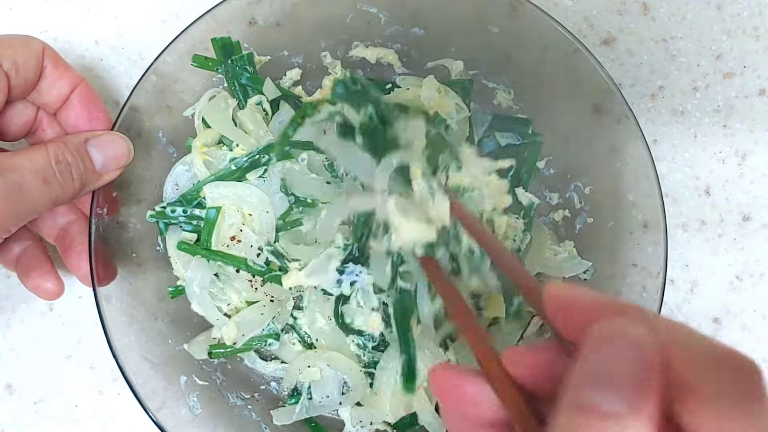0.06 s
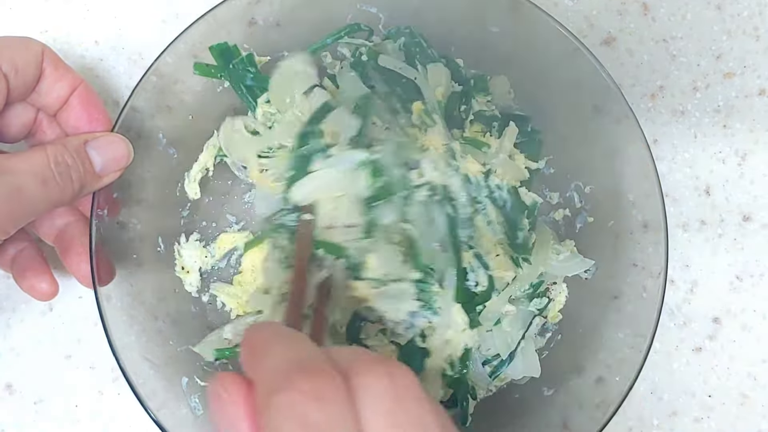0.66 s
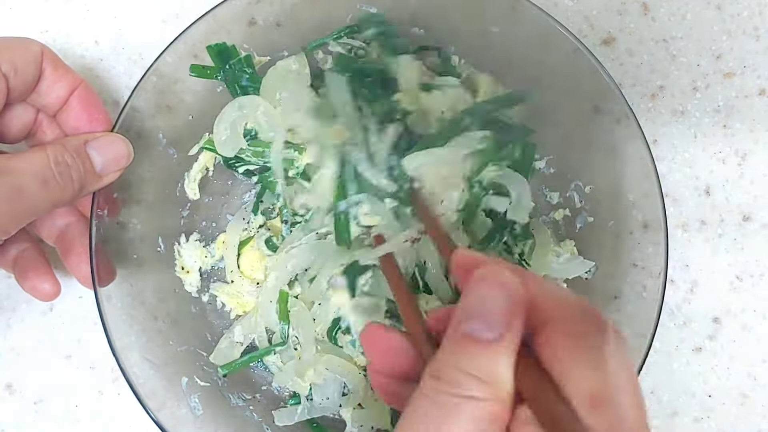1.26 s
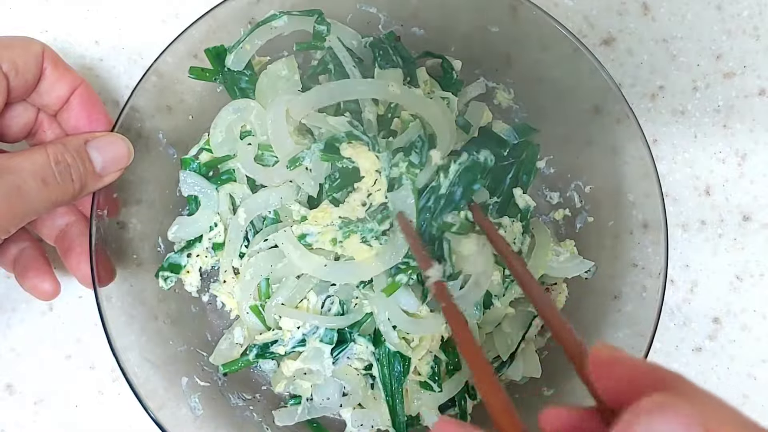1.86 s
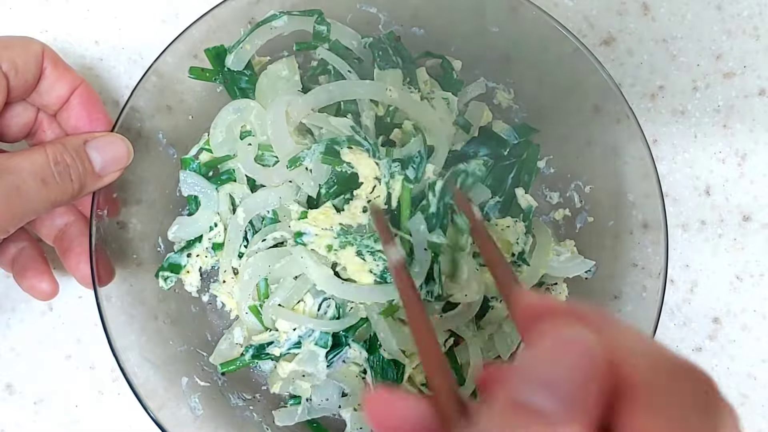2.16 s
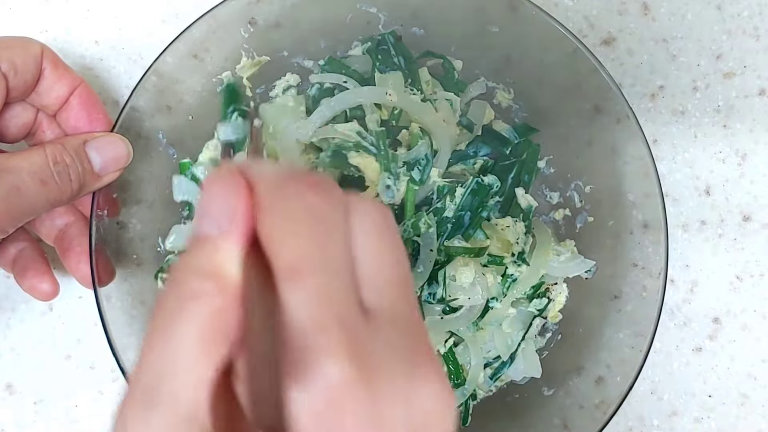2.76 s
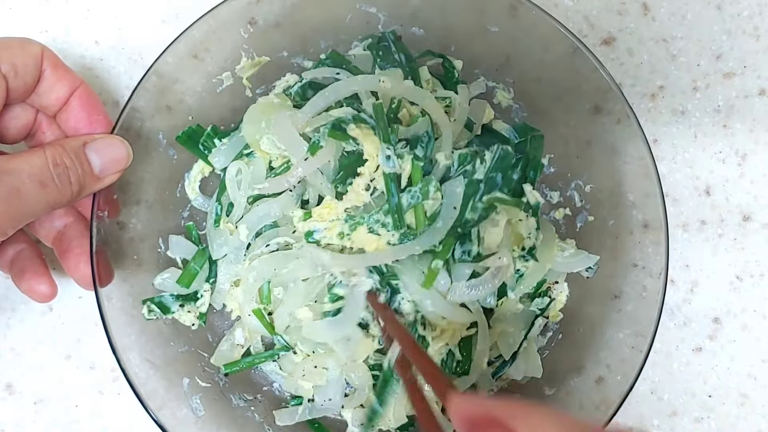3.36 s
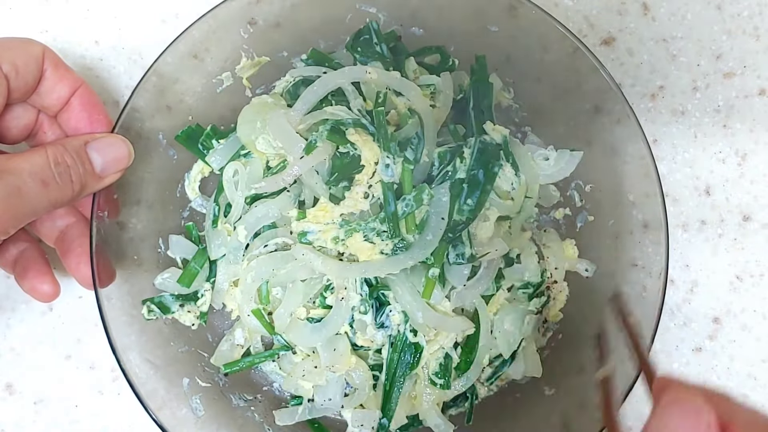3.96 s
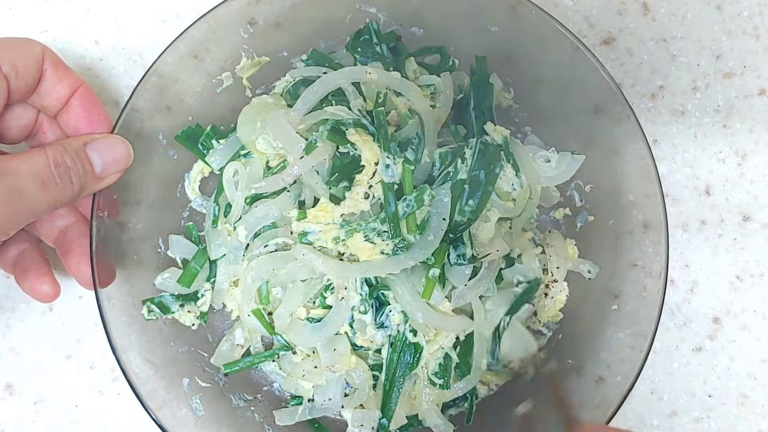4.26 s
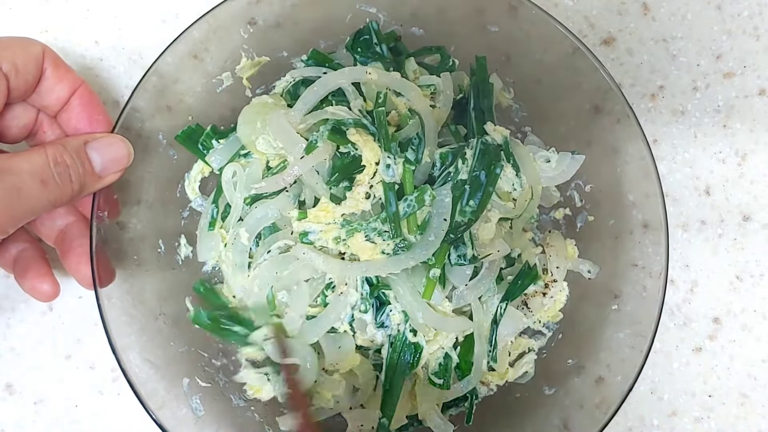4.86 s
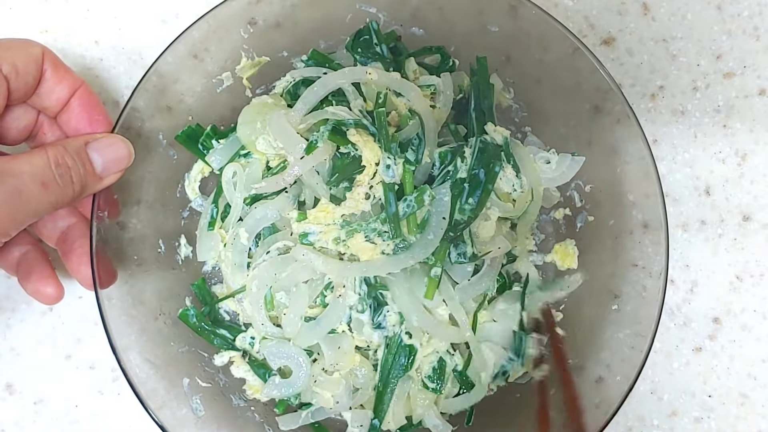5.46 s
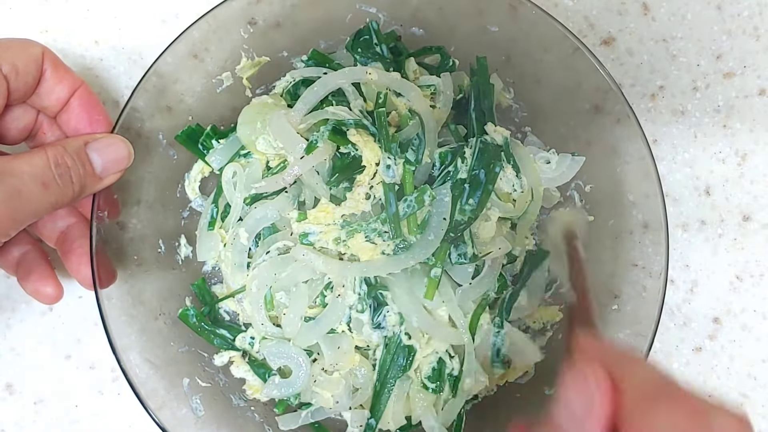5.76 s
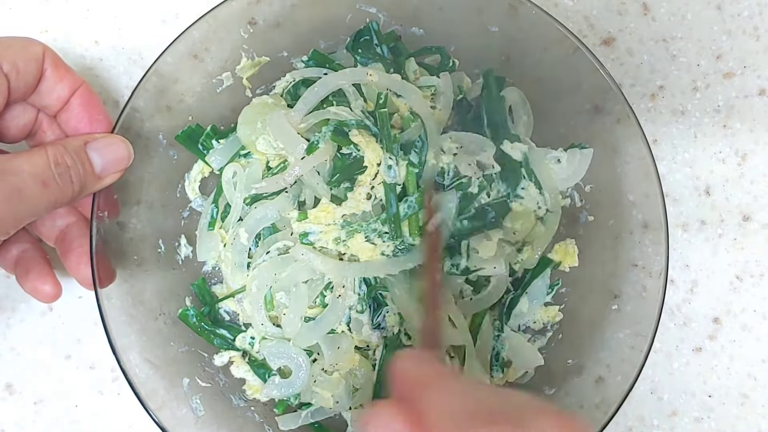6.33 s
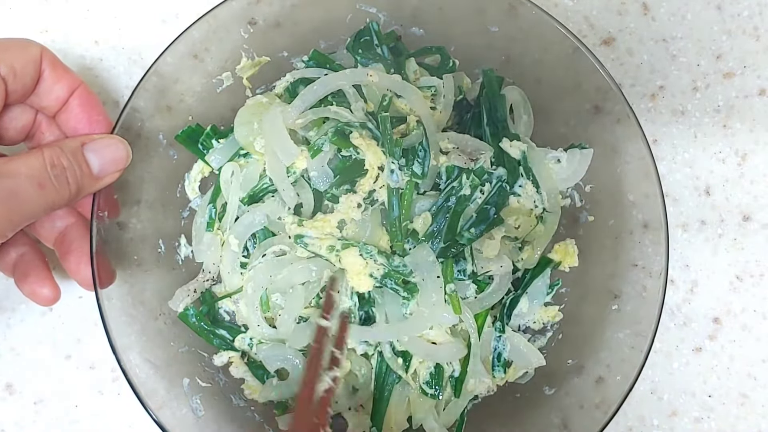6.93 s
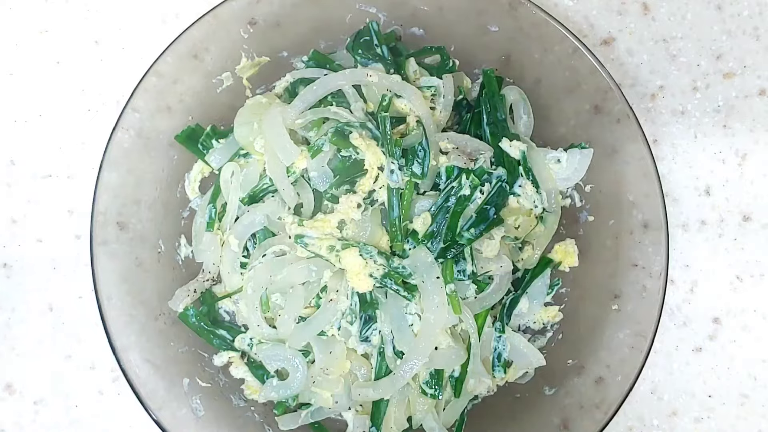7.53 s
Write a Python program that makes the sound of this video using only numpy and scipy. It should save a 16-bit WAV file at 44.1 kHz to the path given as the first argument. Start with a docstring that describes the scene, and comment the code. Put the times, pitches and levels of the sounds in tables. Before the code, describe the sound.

Wooden chopsticks toss a wet salad in a glass bowl on a counter, heard close in a small kitchen with a short echo. For the first two seconds the leaves squelch softly and the tips give light, dull, uneven knocks, with faint low thuds through the counter. Near 1.8 seconds a dragging tip makes the glass sing briefly and softly. At 2.5 seconds comes a louder double knock with a short skid and a ringing clink. A sharp, bright tick follows at about 3.1 seconds, another strong knock and skid at 4.4, and a ringing clink at 4.8. Firm knocks and small wet squelches continue, a few each second, until about 6.3 seconds. The tossing then eases, with one more clear knock near 7.3 seconds and a last faint stir. Soft air noise and a faint, low appliance hum run underneath throughout.

```python
"""Wooden chopsticks toss a wet salad in a glass bowl, held by hand on the counter of a small, hard kitchen.
First the dressed leaves squelch and the tips, mostly through leaves, knock dully while the counter thuds.
Near 1.8 s a dragging tip makes the glass sing softly. From 2.5 s the knocks grow louder, and until 5.2 s
bare wood now and then skids on the wall or clinks and rings it. After 6.3 s the tossing eases off,
ending in one faint stir. Soft air noise and the hum of an appliance lie under it all."""
import sys
import numpy as np
from scipy import signal
from scipy.fft import rfft, irfft, next_fast_len
from scipy.io import wavfile
from scipy.ndimage import uniform_filter1d, map_coordinates

SR = 44100
rng = np.random.default_rng(int(sys.argv[2]) if len(sys.argv) > 2 else 0)


def generate_wav(sig):
    """Save sig (samples, or channels by samples) to the path in sys.argv[1] as 16-bit PCM at SR."""
    pcm = np.round(np.clip(np.atleast_2d(sig).T, -1, 1) * 32767).astype(np.int16)
    wavfile.write(sys.argv[1], SR, pcm)


N = 339123
TIME = np.arange(N) / SR
AGE = np.arange(SR // 2) / SR  # seconds since a hit
TOP_HZ = 15750  # the highest pitch that is kept

# A mode is one tone that a struck thing rings with; its fade time (t60) is how long it takes to drop 60 dB.
# Modes of the chopstick and the full bowl's bottom: (pitch [Hz], relative level [dB], fade time [s])
KNOCK_MODES = [(414, -22.5, 0.03), (505, -24.5, 0.042), (734, -26, 0.3), (870, -19, .04),
               (995.6, -2, 0.045), (998.5, -13.5, 0.12), (1054.3, -8, .035), (1160.5, -14, 0.055),
               (1359, -10.5, 0.036), (1474, -13.5, 0.058), (1767, -5.5, 0.032), (1893, -2.5, 0.026),
               (1987, -6.5, .045), (2160, -17, .03), (2920, -26, 0.015), (3130, -17.5, 0.034),
               (3400, -20.5, 0.06), (3580, -13, 0.023), (3870, -27, 0.074), (5420, -21, .03),
               (6010, -12, 0.011), (6330, -26.5, 0.099), (7650, -30.5, .04), (8180, -23.5, 0.072)]
# Modes of the counter and the cabinet below: (pitch [Hz], relative level [dB], fade time [s])
COUNTER_MODES = [(89.3, -13.5, 0.52), (113.84, 1.5, 0.23), (126.3, 2, 0.23), (160.4, -1, 0.2)]
# Chopstick tips knock on the bowl, most through leaves, a few bare and bright:
# (time [s], knock level [dB], brightness [dB], relative thud level [dB])
KNOCKS = [(.0506, -63, -12, -86), (.4008, -59.5, -16.5, -79), (.6208, -37.5, -8.5, -70),
          (.6484, -48.5, -39, -66), (.7873, -54, -9, -68), (.9386, -63, -10, -83), (1.0294, -56, -24, -66),
          (1.2548, -39.5, -14, -51), (1.401, -37.5, -0.5, -62), (2.1365, -42.5, -19, -55.5),
          (2.2223, -35, -0.5, -67.5), (2.5108, -26, 10, -50.5), (2.52, -22.5, 7, -47.5),
          (2.836, -35.5, 9.5, -58), (3.0669, -27, -5.5, -41.5), (3.5461, -35, -6.5, -58),
          (3.788, -43, -5, -53), (3.9148, -33.5, -3, -60.5), (4.0951, -46, -1.5, -67.5),
          (4.1864, -44.5, -25.5, -62), (4.2731, -33, -4.5, -65), (4.407, -41, 10, -46),
          (4.4169, -22, 3.5, -43), (4.5154, -38.5, -4.5, -70.5), (4.7752, -43.5, 18, -52.5),
          (5.1817, -44.5, 10.5, -57.5), (5.2137, -39.5, -4, -55.5), (5.3856, -28, 1, -53),
          (5.5347, -54.5, 11.5, -61), (5.5921, -27, -2, -49.5), (5.6903, -25.5, 4, -52.5),
          (5.9192, -45, 8.5, -57.5), (6.01, -25.5, 2.5, -56.5), (6.2298, -33.5, -10.5, -52),
          (6.2991, -28.5, -0.5, -62), (6.8713, -48, -17, -72), (6.9644, -56, -12, -71.5),
          (7.2729, -35, -2.5, -63)]


def knocks():
    """The salad damps the bowl, so each knock is short; the counter's thud swells and dies slowly."""
    contact_colour = [(150, -25.5), (600, -13), (1500, 5.5), (3600, -3), (4600, -9.5), (8300, -13.5),
                      (11000, -43), (16000, -56)]
    shuffle_colour = [(40, -1), (150, 2), (300, -7.5), (500, 0), (900, -33)]
    out = np.zeros((2, N))
    for start, db, bright_db, thud_db in KNOCKS:
        body = ring(KNOCK_MODES, scatter_db=1.5, detune=.0097, attack_s=.0011, apart_hz=6970,
                    bright_db=bright_db)
        contact = unit(burst(contact_colour, t60=.025), .0066)
        knock = unit(body, .0092) + amp(bright_db - 10.5) * contact
        add(out, start, in_kitchen(amp(db) * knock, wet_db=-9.5))
        thud = unit(ring(COUNTER_MODES, scatter_db=-.5, detune=.035, attack_s=.2, apart_hz=1500), .09)
        # the bowl shifts on its foot: 1 dB louder for every 2 dB of thud
        shuffle = unit(all_around(burst(shuffle_colour, t60=.3)), .07)
        add(out, start, amp(thud_db - 1) * thud + amp(.5 * thud_db - 34.5) * shuffle)
    return out


# Tone colour of a tick on the rim: (pitch [Hz], relative level [dB])
TICK_COLOUR = [(600, -37), (2500, -25), (3600, -19), (4300, -18.5), (5500, -13.5), (7400, 1.5), (8200, -5),
               (9300, -14.5), (10400, -23), (12500, -36.5), (16000, -58.5)]
# High, quickly fading modes of the rim: (pitch [Hz], relative level [dB], fade time [s])
RIM_MODES = [(5750, -4.5, 0.067), (6900, -11, 0.033), (7440, 0.5, 0.049), (8230, -5.5, .1),
             (8730, -7.5, .1), (8660, -5, .1)]
# Modes of the freely ringing glass wall: (pitch [Hz], relative level [dB], fade time [s])
GLASS_MODES = [(734, 0, .23), (1007, -13, .2), (1795, -14, .17), (2430, -19, .17), (3415, -1.5, .22),
               (4560, .5, .17), (5830, -4.5, .25), (7294, -4, .22), (7811, -11, .23), (8856, -19, .22)]
# Bare wood hits the glass: (time [s], relative tick level [dB], ring level [dB], ring brightness [dB])
CLINKS = [(2.5095, -34, -38, 8.5), (2.52, -38, -50.5, 6.5), (2.836, -58, -42, -11),
          (3.0669, -13, -47.5, 4.5), (4.0951, -60.5, -56.5, -14.5), (4.408, -50, -58, -4),
          (4.7747, -20.5, -37, 1.5), (5.1817, -71, -54.5, 3.5)]


def clinks():
    """A hard hit gives a sharp tick at the rim and leaves the glass ringing."""
    out = np.zeros((2, N))
    for start, tick_db, ring_db, bright_db in CLINKS:
        shared, apart = burst(TICK_COLOUR, t60=.016)
        crack = unit(shared + np.outer([.7, -.7], apart), .013)  # partly alike on the left and right
        rim = unit(ring(RIM_MODES, scatter_db=2, detune=.001, attack_s=.0004, apart_hz=20000), .012)
        tick = amp(tick_db - 4.5) * (crack + amp(-10.5) * rim)
        wall = ring(GLASS_MODES, scatter_db=1.5, detune=.0003, attack_s=.003, apart_hz=14000,
                    bright_db=bright_db)
        glass = amp(ring_db) * unit(wall, .07)
        add(out, start, in_kitchen(tick, wet_db=-4.5) + in_kitchen(glass, wet_db=-8))
    return out


# Tone colour of wet leaves: (pitch [Hz], relative level [dB])
SQUELCH_COLOUR = [(300, -4.5), (1500, -7.5), (3000, -11), (4500, -14), (6200, -9), (7800, 3.5), (9200, -2),
                  (10500, -9), (12500, -18.5), (16000, -31)]
# Wet leaves snap apart: (time [s], relative level [dB])
SNAPS = [(0.196, -53), (0.7123, -38.5), (0.7955, -38), (1.2155, -44.5), (1.296, -58), (1.5614, -43),
         (1.75, -51), (2.1745, -40), (2.922, -35.5), (3.7897, -31), (5.385, -33.5), (5.9165, -35.5),
         (6.5789, -46.5)]


def wet_leaves(hiss_db=-8):
    """Films of dressing burst in clumps of tiny pops as the leaves slide and part."""
    clumps = amp(3 * wobble(60))
    fizz = bubble_pops() + amp(hiss_db) * rng.standard_normal((2, N))
    out = stirring() * clumps * unit(coloured(fizz, SQUELCH_COLOUR))
    for start, db in SNAPS:
        add(out, start, amp(db - 9.5) * unit(burst(SQUELCH_COLOUR, t60=.0096), .0016))
    return in_kitchen(out, wet_db=-3, build_s=.0015)


def bubble_pops(count=5500, centre_hz=7200, spread=.35, fade_cycles=3, size_db=5):
    """Tiny bubbles burst at random times and places, each a high tone that dies in a few swings."""
    starts = (rng.random(count) * N).astype(int)
    hz = np.minimum(centre_hz * np.exp(spread * rng.standard_normal((count, 1))), TOP_HZ)
    size = np.minimum(rng.exponential(size=(count, 1)), 3)
    left_share = rng.random((count, 1))
    t = AGE[:SR // 300]
    pops = amp(size_db * size) * np.sin(2 * np.pi * hz * t) * np.exp(-hz * t / fade_cycles)
    slots = (starts[:, None] + np.arange(len(t))).ravel()  # where each pop's samples land
    sides = [np.bincount(slots, (pops * share).ravel(), N)[:N] for share in (left_share, 1 - left_share)]
    return unit(np.array(sides))


# The chopsticks push through the leaves: (time [s], length [s], level [dB])
STROKES = [(0, 0.11, -79), (0.609, .11, -54.5), (1.228, 0.13, -54.5), (1.469, 0.095, -66.5),
           (2.074, 0.087, -68), (2.63, 0.025, -66), (2.883, 0.028, -60), (3.335, 0.13, -76),
           (3.756, .04, -52), (3.917, 0.04, -62.5), (4.098, 0.091, -59.5), (5.158, 0.054, -65.5),
           (5.328, 0.017, -50), (5.544, 0.023, -52.5), (5.644, 0.024, -55), (5.857, .04, -50),
           (6.188, 0.062, -59), (6.467, 0.13, -74), (7.567, 0.094, -75.5)]


def stirring(push_s=.03, settle_t60=.27, resting_db=-85):
    """How loud the leaves are: each stroke builds, holds while the tips travel, and dies as they settle."""
    effort = np.full(N, amp(resting_db))
    for start, length, db in STROKES:
        push = np.clip((TIME - start) / push_s, 0, 1)
        settle = fade(np.maximum(TIME - start - length, 0), settle_t60)
        effort += amp(db) * push * settle
    return effort


# A tip skids and chatters along the wall: (time [s], length [s], level [dB], centre pitch [Hz])
SKIDS = [(1.453, 0.0049, -61.5, 2660), (2.501, .022, -27, 1555), (4.389, 0.054, -42, 1110)]


def skids(slips_per_s=900, width=.45):
    """Quick, uneven slips swell and ease, shaking one broad mode of the chopstick."""
    out = np.zeros((2, N))
    for start, length, db, centre_hz in SKIDS:
        def wood(hz):
            """The chopstick answers most near its centre pitch."""
            damping = 1j * hz * width * centre_hz
            return (damping / (centre_hz ** 2 - hz ** 2 + damping)) ** 2

        slips = rng.random(len(AGE)) < slips_per_s / SR
        hiss = .032 * rng.standard_normal((2, len(AGE)))
        pressure = np.sin(np.pi * np.minimum(AGE / length, 1))
        chatter = unit(filtered((slips + hiss) * pressure, wood), length)
        add(out, start, in_kitchen(amp(db) * chatter, wet_db=-.5))
    return out


# A tip drags on the glass and makes it sing: (time [s], length [s], level [dB])
RUBS = [(1.759, 0.12, -55.5)]


def rubs():
    """Rubbing swells the lowest mode of the glass for a moment."""
    out = np.zeros((2, N))
    lowest_hz = GLASS_MODES[0][0]
    for start, length, db in RUBS:
        t = AGE[AGE < length]
        tone = np.sin(np.pi * t / length) * np.sin(2 * np.pi * lowest_hz * t)
        add(out, start, amp(db) * np.array([tone, tone]))
    return out


# How long the kitchen echoes: (pitch [Hz], fade time [s])
ECHO_TIMES = [(120, 0.71), (500, 0.28), (1500, 0.23), (4000, 0.3), (8000, 0.24), (14000, 0.067)]


def in_kitchen(x, wet_db, build_s=.0021):
    """A sound plus its dense echo off counter, tiles and cupboards; wet_db sets the echo's level."""
    hz, t, bands = signal.stft(rng.standard_normal((2, len(AGE))), SR, nperseg=256)
    bands = bands * fade(t, along(ECHO_TIMES, hz)[:, None])
    echo = signal.istft(bands, SR, nperseg=256)[1][:, :len(AGE)]
    echo *= 1 - np.exp(-(AGE / build_s) ** 2)
    echo = all_around(echo / np.linalg.norm(echo[0]))
    return x + amp(wet_db) * signal.fftconvolve(x, echo, axes=1)[:, :x.shape[1]]


# Tone colour of the room's air: (pitch [Hz], relative level [dB])
AIR_COLOUR = [(25, -32), (45, -18), (65, -17), (110, -16.5), (180, -24), (270, -25.5), (450, -23.5),
              (700, -26.5), (1000, -22), (1380, -17.5), (1800, -31.5), (2600, -36), (5500, -39.5),
              (6800, -39.5), (7500, -32.5), (8900, -36), (9800, -39), (16000, -45.5)]
# The tones in each hum: (multiple of the lowest pitch, level [dB])
HUM_TONES = [(1, -63), (2, -77.5), (3, -85.5)]


def air_and_hum(air_db=-69, mains_hz=60.02, motor_hz=58.88, waver_db=1.5, in_step_s=.04):
    """Soft air noise and an appliance: its motor lags the mains power, so the two hums throb slowly."""
    air = unit(coloured(all_around(rng.standard_normal((2, N))), AIR_COLOUR))
    hum = np.zeros(N)
    for hz in (mains_hz, motor_hz):
        phase = 2 * np.pi * hz * (TIME - in_step_s) + .15 * wobble(1.5)
        for multiple, db in HUM_TONES:
            hum += amp(db + waver_db * wobble(1.3)) * unit(np.sin(multiple * phase))
    return amp(air_db) * air + hum


# How alike the room sounds on the left and right: (pitch [Hz], likeness [0 to 1])
LIKENESS = [(60, 1), (300, 0.26), (1200, 0.19), (4000, 0.059), (10000, 0.12)]


def all_around(noises):
    """Blend two noises so they seem to come from all around: alike in the bass, unrelated up high."""
    def blend(hz):
        """How much is shared by both sides, and how much is opposite."""
        angle = np.arccos(np.clip(along(LIKENESS, hz), -1, 1)) / 2
        return np.array([np.cos(angle), np.sin(angle)])

    shared, apart = filtered(noises, blend)
    return np.array([shared + apart, shared - apart])


def ring(modes, scatter_db, detune, attack_s, apart_hz, bright_db=0):
    """Struck modes vary with the spot that is hit; high ones reach left and right out of step."""
    hz, db, t60 = np.transpose(modes)[..., None]
    strength, tuning, flip, lag = rng.standard_normal((4, len(modes), 1))
    treble = np.clip(np.log2(hz / 1500), 0, 1)
    level = amp(db + scatter_db * strength + bright_db * treble)
    phase = 2 * np.pi * hz * (1 + detune * tuning) * AGE + np.pi * (flip > 0)
    offset = lag * np.minimum(hz / apart_hz, 1)
    loudness = level * fade(AGE, t60) * (1 - np.exp(-AGE / attack_s))
    return np.array([(loudness * np.sin(phase + side * offset)).sum(0) for side in (-1, 1)])


def burst(colour, t60):
    """A fading puff of noise with the given tone colour."""
    return coloured(rng.standard_normal((2, len(AGE))) * fade(AGE, t60), colour)


def coloured(x, colour):
    """Shape x with (pitch [Hz], level [dB]) points."""
    n = x.shape[-1]
    padded = 2 * next_fast_len(n // 2 + 4096)
    gain = amp(along(colour, np.fft.rfftfreq(padded, 1 / SR)))
    # fold the filter's early half onto its late half (minimum phase), so nothing sounds before its cause
    cepstrum = irfft(np.log(gain), padded)
    cepstrum[1:padded // 2] *= 2
    cepstrum[padded // 2 + 1:] = 0
    return irfft(rfft(x, padded) * np.exp(rfft(cepstrum)), padded)[..., :n]


def filtered(x, response):
    """Turn each pitch in x up or down by response(hz)."""
    n = x.shape[-1]
    padded = next_fast_len(n + 8192)
    hz = np.fft.rfftfreq(padded, 1 / SR)
    return irfft(rfft(x, padded) * response(hz), padded)[..., :n]


def amp(db):
    """Turn decibels into a number to multiply by."""
    return 10 ** (np.asarray(db) / 20)


def unit(x, span_s=None):
    """Scale to an average (rms) level of 1, over all of x or over its first span_s seconds."""
    head = x if span_s is None else x[..., :int(span_s * SR)]
    return x / np.sqrt(np.mean(head ** 2) + 1e-20)


def fade(t, t60):
    """Die away smoothly, 60 dB down after t60 seconds."""
    return np.exp(-np.log(1000) * t / t60)


def along(points, hz):
    """Read between (pitch [Hz], value) points, with octaves evenly spaced."""
    pitches, values = np.transpose(points)
    return np.interp(np.log(hz + 1), np.log(pitches), values)


def wobble(rate):
    """A smooth curve through rate random values a second."""
    return map_coordinates(rng.standard_normal(int(N * rate / SR) + 4), [TIME * rate])


def add(track, start, sound):
    """Mix a sound into the track, start seconds in."""
    part = track[:, max(round(start * SR), 0):][:, :sound.shape[-1]]
    part += sound[:, :part.shape[1]]


# How far the bowl's sound leans to the left: (pitch [Hz], left minus right [dB])
BALANCE = [(100, 3), (400, -0.5), (1000, 2.5), (2000, 2.5), (3500, 0), (6500, 2.5), (7500, 6.5),
           (8200, -5.5), (12000, -1)]


def scene():
    """The bowl sits a little to the left; each side favours different parts of the treble."""
    bowl = knocks() + clinks() + skids() + rubs() + wet_leaves()
    lean = lambda hz: amp(np.outer([.5, -.5], along(BALANCE, hz)))
    return filtered(bowl, lean) + air_and_hum()


def record(dry):
    """Turn down faint bass, round off the sharpest peaks and cut everything above TOP_HZ."""
    bass_hz, faint_db, ceiling = 100, -54.5, .95
    bass = filtered(dry, lambda hz: 1 / (1 + (hz / bass_hz) ** 8))
    bass_power = uniform_filter1d(np.mean(bass ** 2, axis=0), size=SR // 10)
    bass_kept = np.minimum(np.sqrt(np.abs(bass_power)) / amp(faint_db), 1)
    thinned = dry - bass * (1 - bass_kept)
    rounded = thinned / (1 + np.abs(thinned / ceiling) ** 6) ** (1 / 6)
    return filtered(rounded, lambda hz: hz < TOP_HZ)


dry = scene()
out = record(dry)
generate_wav(out)
```